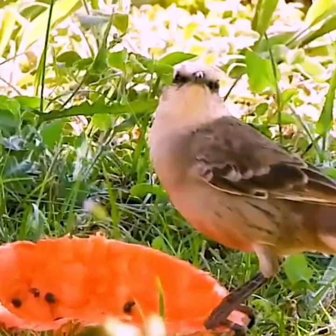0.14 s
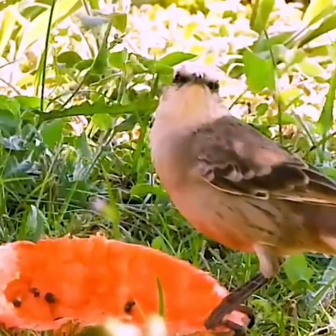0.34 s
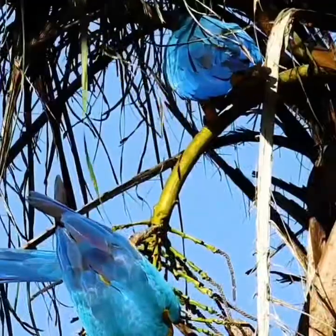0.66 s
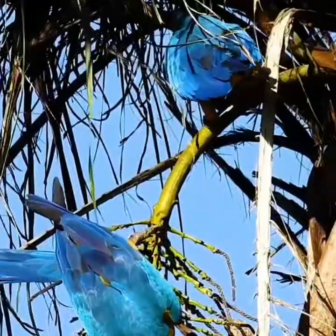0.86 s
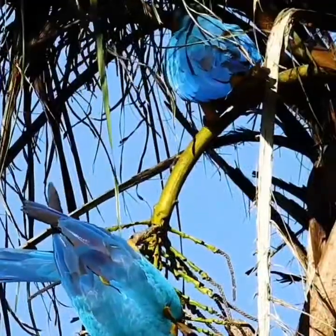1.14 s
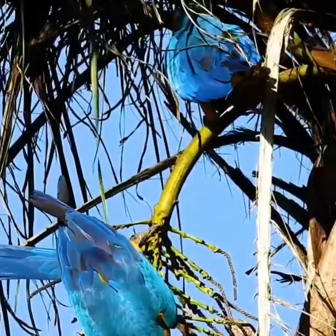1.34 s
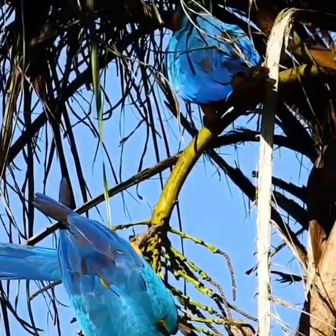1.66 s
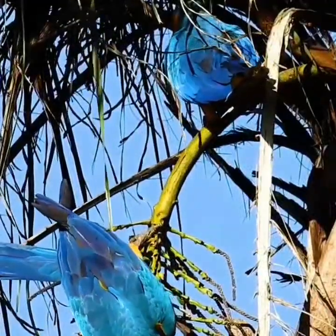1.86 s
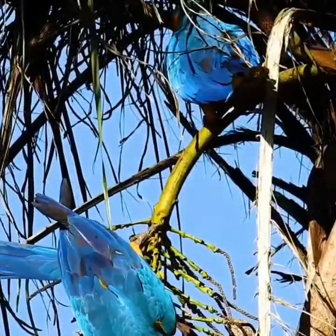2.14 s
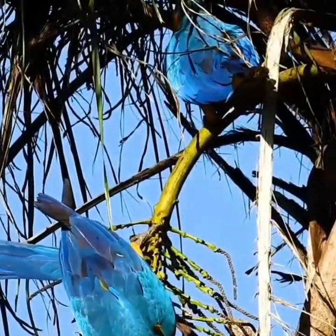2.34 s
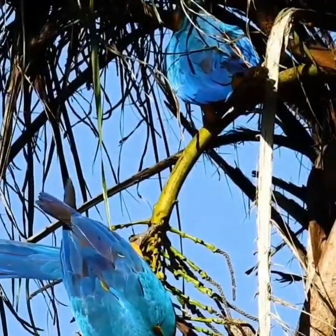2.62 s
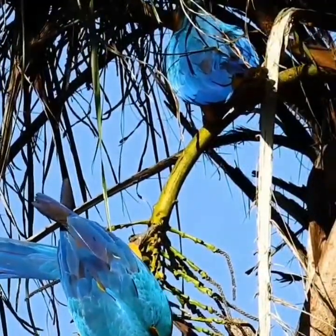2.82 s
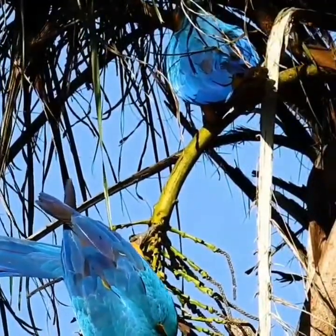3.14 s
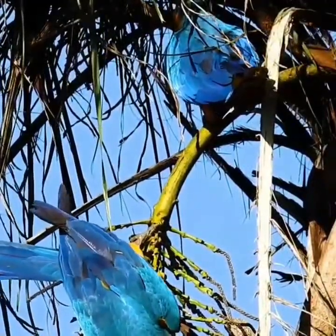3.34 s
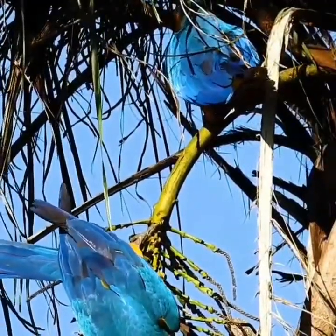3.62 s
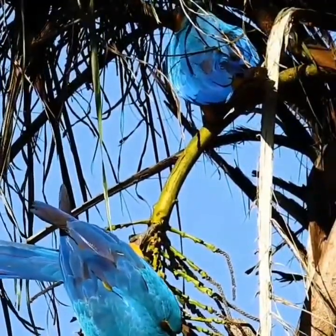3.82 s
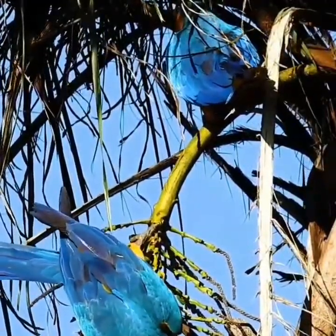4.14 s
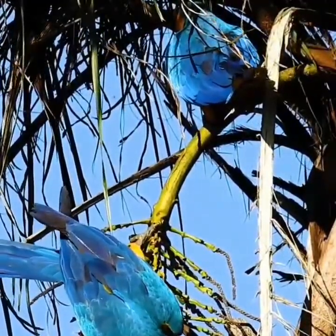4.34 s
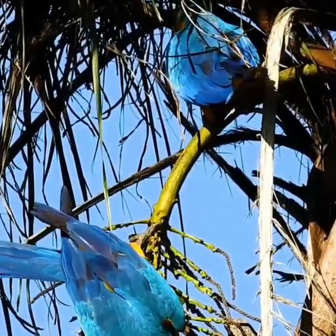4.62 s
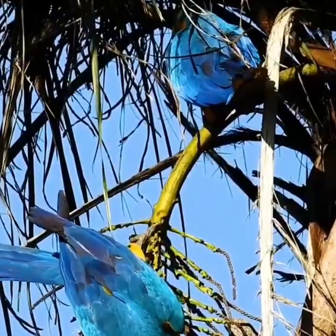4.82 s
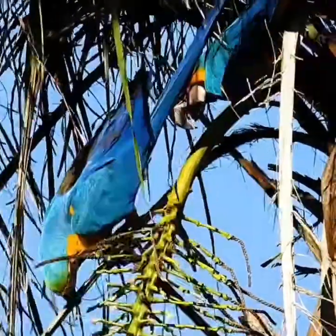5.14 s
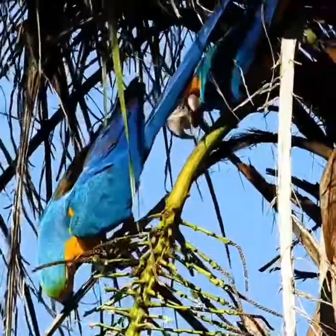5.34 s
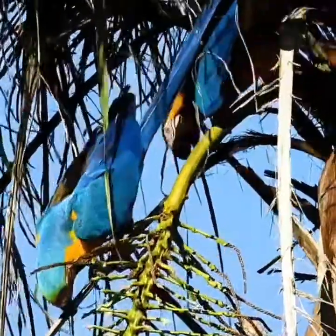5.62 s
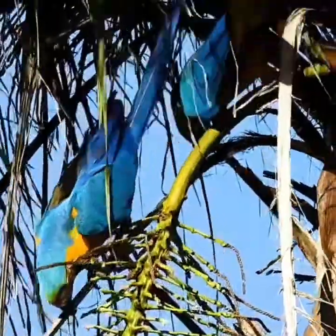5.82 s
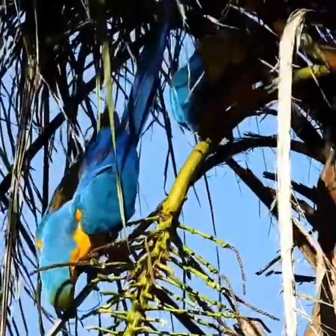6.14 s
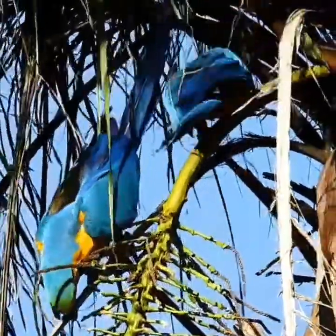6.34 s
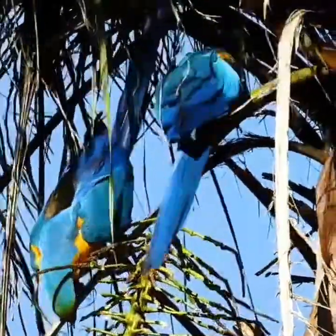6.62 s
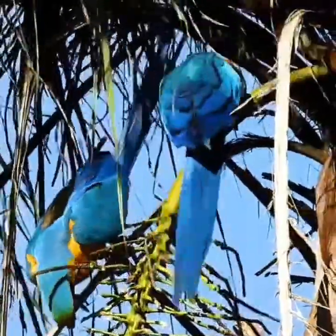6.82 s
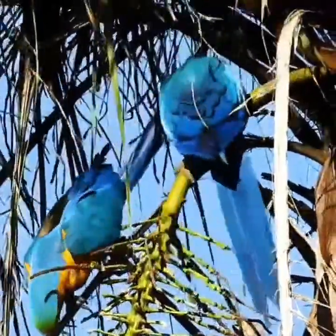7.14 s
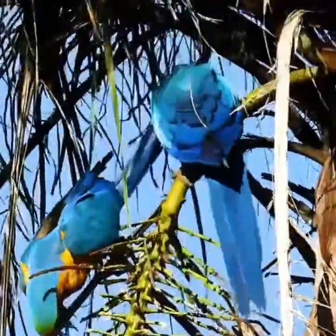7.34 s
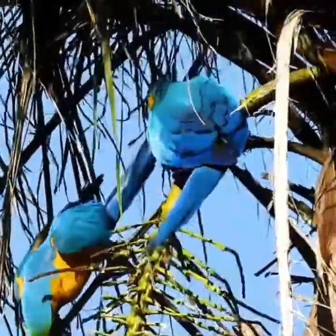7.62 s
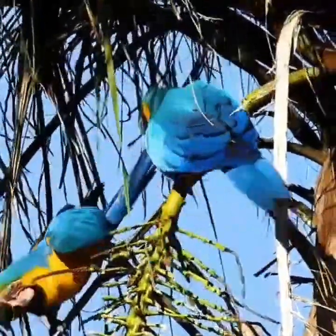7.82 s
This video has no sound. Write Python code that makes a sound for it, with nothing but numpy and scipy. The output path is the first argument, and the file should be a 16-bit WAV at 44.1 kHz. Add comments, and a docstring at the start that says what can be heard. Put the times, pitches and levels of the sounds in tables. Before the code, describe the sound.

Two close, buzzy chirps from a songbird and a brief rustle open the scene outdoors among palms. Almost at once a parrot flock starts squawking on both sides and keeps going, with loud raspy calls from nearer birds, a couple of croaks and a few whistled notes on top. A faint high hiss lies underneath. The microphone cuts out once very briefly and distorts a little on the peaks.

```python
"""A garden with palms. A songbird gives two buzzy chirps, then a parrot flock squawks, with single
squawks, croaks and pure notes above the din. Vibrating membranes make the calls, throat and beak shape
their partials, leaves and trunks scatter them. A rustle at the start, a high hiss throughout.
The sound drops out briefly near 5.2 s; loud peaks overload the recorder."""
import sys
import numpy as np
from scipy import signal
from scipy.fft import rfft, irfft, next_fast_len
from scipy.io import wavfile
from scipy.ndimage import uniform_filter1d, minimum_filter1d

SR = 44100
rng = np.random.default_rng(int(sys.argv[2]) if len(sys.argv) > 2 else 0)


def log_audio(samples):
    """Write samples as a 16-bit WAV file to the path given in sys.argv[1]."""
    # one column per channel
    frames = np.atleast_2d(samples).T
    # limit to full scale, then quantise
    limited = np.clip(frames, -1, 1)
    pcm = np.round(limited * 32767).astype(np.int16)
    wavfile.write(sys.argv[1], SR, pcm)


N = 351918

# near squawks, one table each: time_s, pitch_hz, level_db, tilt_db_per_oct (beak opening)
SQUAWK_CONTOURS = [
    [(1.01, 1221, -24, -6), (1.038, 1114, -21.5, -4.5), (1.092, 1160, -10, 2.5), (1.118, 1209, -20, 2),
     (1.19, 1154, -14.5, 3), (1.202, 1295, -14.5, 2.5), (1.23, 1280, -13.5, 4), (1.246, 1136, -13.5, -1),
     (1.28, 1120, -15.5, 8)],
    [(1.455, 1212, -16, -18), (1.469, 1252, -15, 3), (1.509, 1195, -16, 7.5), (1.537, 1313, -13.5, 1),
     (1.565, 1330, -20, -0.5), (1.593, 1526, -14, 4.5), (1.617, 1512, -15, -4), (1.629, 1387, -13, 0.5),
     (1.65, 1334, -17, 1)],
    [(1.83, 1139, -19, -2), (1.836, 1132, -13.5, -1), (1.846, 1256, -17, 9), (1.862, 1261, -7, -1.5),
     (1.892, 1213, -19, -1.5), (1.928, 1269, -8.5, 3), (1.968, 1245, -19, 4.5), (2.04, 1144, -10, 10.5)],
    [(2.215, 1209, -11, 0), (2.239, 1258, -12.5, -3), (2.295, 1245, -15.5, -3), (2.313, 1297, -11, 1),
     (2.351, 1315, -11.5, 2.5), (2.363, 1222, -14.5, -3), (2.389, 1253, -18.5, -1), (2.401, 1132, -16, 8),
     (2.42, 1110, -15, -2)],
    [(3.09, 1193, -13.5, 4), (3.108, 1370, -14, 7), (3.122, 1340, -20, 2), (3.138, 1288, -16, 2),
     (3.15, 1343, -19, -3), (3.158, 1228, -15, 2), (3.19, 1280, -25, 3)],
    [(3.7, 1115, -14.5, -1), (3.734, 1258, -9, 9.5), (3.754, 1254, -14.5, 0.5), (3.782, 1434, -13, -6),
     (3.806, 1253, -9, 8), (3.844, 1223, -16, 5), (3.862, 1267, -12, 5), (3.876, 1120, -10, 8),
     (3.9, 1140, -49, 2)],
    [(4.04, 1220, -12, 2), (4.08, 1223, -12.5, 4), (4.118, 1333, -14, -7), (4.128, 1192, -13.5, 0),
     (4.186, 1290, -13, 7.5), (4.206, 1206, -12.5, 2), (4.242, 1240, -16.5, -6), (4.248, 1210, -9.5, 3),
     (4.27, 1217, -16.5, 4)],
    [(4.355, 1200, -17, -4), (4.365, 1131, -17, 1), (4.395, 1170, -7.5, 5.5), (4.421, 1350, -20, -2.5),
     (4.443, 1280, -10, 7), (4.457, 1219, -13, -1), (4.475, 1237, -16, -2.5), (4.495, 1152, -17, -1),
     (4.51, 1090, -22, -8)],
    [(4.58, 1156, -22, 6), (4.588, 1092, -19, -5), (4.604, 1137, -14, -2), (4.646, 1181, -16.5, -8),
     (4.672, 1126, -11.5, -3), (4.714, 1315, -8, 6.5), (4.75, 1270, -13, -1.5), (4.768, 1334, -12, 2),
     (4.8, 1236, -13, 2)],
    [(4.99, 1236, -10, -3), (4.998, 1158, -14.5, -2.5), (5.012, 1125, -8.5, 3), (5.036, 1150, -21, -3),
     (5.046, 1052, -14, -4), (5.066, 1204, -15.5, 2), (5.09, 1265, -10.5, 2.5), (5.136, 1142, -12.5, 2),
     (5.15, 1090, -31, -2)],
    [(6.37, 1291, -16, -8), (6.39, 1333, -17.5, -12), (6.4, 1418, -9, 1.5), (6.456, 1470, -12.5, 0),
     (6.478, 1430, -18, 2), (6.49, 1490, -22, -2)],
    [(7.09, 1140, -18.5, 0), (7.098, 1260, -15, 1), (7.114, 1279, -11, 5.5), (7.15, 1399, -11, 3.5),
     (7.166, 1434, -9, 4), (7.192, 1450, -21, -3), (7.204, 1317, -12, 4), (7.228, 1250, -13.5, 3),
     (7.24, 1339, -18, 2)],
    [(2.64, 1276, -18, 0), (2.66, 1173, -18, -1.5), (2.69, 1159, -17.5, -3), (2.734, 1246, -12.5, 1.5),
     (2.752, 1140, -15, 11), (2.76, 1140, -16, 0)],
    [(3.42, 1134, -20, -2), (3.432, 1204, -19, 9), (3.506, 1184, -14, -4), (3.53, 1148, -13.5, -3),
     (3.536, 1080, -15.5, -9), (3.56, 1155, -40, 0)],
    [(5.28, 1140, -29, 6), (5.29, 1245, -21, 2.5), (5.332, 1256, -19.5, 1), (5.358, 1232, -30, 7),
     (5.386, 1276, -16, 0), (5.42, 1240, -24, 5)],
    [(5.64, 987, -34, 1.5), (5.668, 1077, -15.5, 2), (5.696, 1048, -19, -3), (5.71, 1079, -31, 0)],
    [(5.84, 1113, -20, 0), (5.86, 1052, -23, 0.5), (5.916, 1234, -23, 1), (5.922, 1313, -17, -4),
     (5.934, 1274, -32, 0), (5.97, 1070, -22, 0)],
    [(6.14, 1066, -20, -12), (6.164, 1108, -27, -5), (6.176, 1248, -23, 9), (6.204, 1268, -29, 4),
     (6.212, 1177, -21.5, 2), (6.26, 1153, -12, 1.5)],
    [(6.27, 1276, -19, -7), (6.294, 1252, -15.5, -4), (6.306, 1144, -16, 0), (6.33, 1142, -16, 0),
     (6.34, 1168, -10, -2), (6.36, 1204, -14.5, 0)],
    [(7.37, 1378, -17, 0), (7.418, 1553, -15, 3), (7.47, 1574, -19, -3), (7.482, 1521, -13.5, 0),
     (7.492, 1567, -18, 1), (7.512, 1418, -14, 1), (7.53, 1425, -22, 2)],
    [(0.64, 1117, -25, 0), (0.68, 1107, -19.5, -1), (0.776, 1130, -22.5, 0), (0.79, 1218, -22, 1),
     (0.822, 1126, -20, 0), (0.882, 1198, -16, 3.5), (0.93, 1090, -27, 0)],
    [(2.92, 1113, -20, 2), (2.934, 1110, -18, 0), (2.958, 1190, -16, 5), (2.992, 1153, -19.5, 7),
     (2.998, 1199, -16.5, 1), (3.058, 1192, -17, 1), (3.08, 1216, -18, -3)],
    [(6.5, 1140, -26, 1), (6.57, 1203, -23.5, -2), (6.608, 1082, -14.5, -3), (6.62, 1145, -21.5, -8),
     (6.692, 1181, -10.5, 4), (6.706, 1083, -28, -4), (6.75, 1155, -21, 0)],
    [(6.76, 1082, -16, 2), (6.782, 1057, -14, 2), (6.802, 1166, -22, -6), (6.836, 1100, -23, 0),
     (6.848, 1140, -12, -4), (6.88, 1166, -24, 4), (6.9, 1020, -24, 0)],
    [(6.9, 996, -23, 3), (6.91, 933, -20.5, 6), (6.994, 1072, -23, -2), (7.016, 1192, -22, -13),
     (7.042, 1182, -25, 4), (7.054, 1100, -21, -4), (7.09, 1159, -22, -7)],
]
# hoarseness, one per squawk: 0 clear, 1 raw
SQUAWK_ROUGHNESS = [.2, .15, .15, .18, .3, .07, .15, .07, .06, .12, .08, .07, .25, .15, .2, .15, .35, .3,
                    .2, .06, .3, .3, .22, .22, .22]
# timbre, one row per squawk: partial1_db ... partial5_db
SQUAWK_PARTIALS = [(-12, -5.5, -0.5, -2.5, -3), (-7.5, 0.5, -2.5, -2.5, -8.5), (-12.5, 1, -2, -3, -4),
                   (-14, 0.5, -1.5, 1, -1), (-12, -0.5, -3.5, -3, -2), (-11, -1.5, -0.5, 0.5, -1.5),
                   (-22, 0, -1.5, -1, -0.5), (-14, -5.5, -5.5, -0.5, -1.5), (-12, 2, 0.5, 0.5, 2),
                   (-12.5, -1.5, 1.5, -2.5, -8), (-11.5, 0.5, 2, -0.5, -10), (-6.5, -0.5, -3.5, -2, 0),
                   (-17.5, -4, -2.5, -5, -4), (-28.5, 0, 0, -10, -15), (-1.5, -4, -14, -4, -1.5),
                   (-12, 0, -16, -10.5, -20), (0.5, -3, -22, -1, -11), (-11.5, -1, -2, -2.5, -3),
                   (-18.5, -0.5, -6, -8, -9), (-13.5, -12, -1, -7.5, -15), (-19, -11, -2, 0, -3),
                   (-23, -16, -0.5, -1, -8), (-12.5, 2.5, -13, -5, -20), (-14.5, 2, -5, -7, -17),
                   (-9.5, 4, -18, -2.5, -19)]
# hoarse croaks: start_s, length_s, top_hz, level_db
CROAK_NOTES = [(5.528, .08, 926, -19.5), (7.229, .18, 834, -11)]
# croak throat response: freq_hz, gain_db
CROAK_THROAT_EQ = [(500, -47), (820, -12), (1300, 9.5), (1700, 0), (2500, 3.5), (3100, 1), (4000, -11),
                   (7900, -1)]
# mouth resonances, beak open: centre_hz, width_hz, gain_db
CROAK_FORMANTS = [(1610, 154, 8), (3050, 260, 10.5)]
# two low coos, a thin whistle, then two ringing tones of the last squawk, ending in a falling note:
# start_s, length_s, first_hz, last_hz, level_db
PURE_NOTES = [(.51, 0.37, 617, 488, -42.5), (1.65, 0.29, 652, 560, -44.5), (2.355, .145, 2990, 2816, -18),
              (7.43, 0.067, 1570, 1600, -22.5), (7.493, 0.051, 3000, 2224, -15)]
# flock envelope: time_s, level_db
FLOCK_LEVEL = [(.485, -17.5), (.57, -17.5), (.68, -12.5), (.87, -13), (.97, -17.5), (1.09, -11),
               (1.33, -15.5), (1.43, -15.5), (1.47, -10.5), (1.68, -15.5), (1.95, -9.5), (2.2, -18),
               (2.22, -8.5), (2.6, -13.5), (3.06, -11), (3.23, -16.5), (3.34, -15.5), (3.37, -10.5),
               (3.52, -11.5), (3.56, -14), (3.82, -10.5), (3.92, -13), (4.17, -7), (4.32, -13), (4.53, -14),
               (4.69, -7), (4.95, -16), (5.01, -6.5), (5.14, -8), (5.24, -20), (5.49, -18.5), (5.57, -13),
               (5.76, -19), (5.87, -13.5), (6.01, -16.5), (6.24, -12.5), (6.36, -10.5), (6.45, -9),
               (6.49, -18.5), (6.54, -19.5), (6.68, -10.5), (6.72, -17.5), (6.79, -15.5), (7.27, -12.5),
               (7.52, -13.5), (7.58, -19), (7.98, -16)]
# flock colour: freq_hz, gain_db
FLOCK_EQ = [(120, -79), (200, -41.5), (603, -15.5), (736, -16.5), (1170, -15), (1560, -4.5), (2220, -2.5),
            (2400, -4), (3160, -1.5), (3680, -2), (3970, -5.5), (4490, -0.5), (6590, 1.5), (7010, -0.5),
            (7800, -13), (10100, -46), (17200, -120)]
# songbird chirps, one table each: time_s, pitch_hz, level_db
CHIRP_CONTOURS = [
    [(0.0, 792, -4), (0.022, 809, -11), (0.042, 760, -11.5), (0.058, 716, -12), (0.08, 704, -12),
     (0.088, 651, -15.5), (0.104, 643, -19), (0.114, 655, -31), (0.125, 642, -32)],
    [(0.19, 630, -23), (0.198, 655, -18), (0.206, 645, -11), (0.226, 705, -10.5), (0.262, 722, -12),
     (0.284, 632, -13.5), (0.3, 624, -14), (0.314, 668, -32), (0.325, 683, -35)],
]
# songbird throat response: freq_hz, gain_db
CHIRP_THROAT_EQ = [(710, -76), (1200, -28), (1520, -13), (2400, -12), (2580, -5.5), (2880, -6.5),
                   (3190, -5), (4850, -8), (6040, -26.5), (6330, -17), (7900, -26.5), (10300, -60),
                   (17400, -120)]
# garden rustle colour: freq_hz, gain_db
RUSTLE_EQ = [(180, -101), (300, -58), (1910, -9), (1990, -10), (2650, -6), (3220, -5), (3350, -2.5),
             (4060, -4), (4790, -4), (7950, -17), (10300, -96), (17500, -120)]
# hiss envelope: time_s, level_db
HISS_LEVEL = [(0, -26), (.15, -40.5), (.26, -29), (.38, -42.5), (.53, -33), (1.8, -34.5), (2.7, -38),
              (4.3, -37.5), (5.1, -34.5), (5.7, -33.5), (6.5, -36), (7.98, -33.5)]
# hiss colour: freq_hz, gain_db
HISS_EQ = [(4790, -19.5), (8150, 3.5), (8240, -19), (8690, 7.5), (9240, 10), (9800, 2), (10100, -0.5),
           (10600, -36), (10800, -16.5), (13700, -7), (14500, -26), (15400, -12.5)]
# microphone port response, birds only: freq_hz, gain_db
PORT_EQ = [(100, -52), (250, -11), (400, -5.5), (700, -3), (7600, -0.32), (7880, -4.5), (8000, -50)]
# left-right difference: freq_hz, gain_db
SIDE_EQ = [(300, -22), (700, -54), (1200, -69), (2000, -27), (3000, -15), (4500, -5.5), (6000, -1),
           (7800, 1.5), (8200, -23), (9400, -24), (10000, -7.5), (15000, -1.5)]
# brief dropout: time_s, gain_db
DROPOUT_GAIN = [(5.14, 0), (5.17, -55), (5.215, -48), (5.24, 1)]

NOTE_ENDS_DB = -7


def squawks(sixth_partial_db=-13, wander_db=2):
    """Near parrots: six drifting partials that brighten as the beak opens."""
    out = np.zeros(N)
    for rows, rough, own_db in zip(SQUAWK_CONTOURS, SQUAWK_ROUGHNESS, SQUAWK_PARTIALS):
        hz, level_db, tilt_db_per_oct = columns(rows, span(rows))
        timbre_db = [*own_db, own_db[-1] + sixth_partial_db]
        shape_db = np.array([db + tilt_db_per_oct * np.log2(k / 3) for k, db in enumerate(timbre_db, 1)])
        shape_db -= 10 * np.log10((gain_of(shape_db) ** 2).sum(0))  # unit power
        drift_db = wander_db * smooth_noise(6, len(hz), window=900)
        add(out, rows[0][0], syrinx(hz, level_db + shape_db + drift_db, rough, jitter=.01194))
    return out


def croaks(arch_depth=.12, beak_shut=.73):
    """Arched rasps. Alternate pulses are weaker, adding lines between the partials."""
    out = np.zeros(N)
    for start_s, length_s, top_hz, level_db in CROAK_NOTES:
        progress = np.linspace(0, 1, round(length_s * SR))
        arch = np.sin(np.pi * progress ** .85)
        sub_hz = top_hz * (1 - arch_depth + arch_depth * arch) / 2
        # the beak opens fast, raising the formants, and closes slowly
        beak = beak_shut + (1 - beak_shut) * np.sin(np.pi * progress ** .55)
        partials_db = []
        for k in range(1, 18):
            mouth_db = sum(db * np.exp(-((k * sub_hz - centre_hz * beak) / width_hz) ** 2)
                           for centre_hz, width_hz, db in CROAK_FORMANTS)
            partials_db.append(eq_db(CROAK_THROAT_EQ, k * sub_hz) - 5 * (k % 2) + mouth_db)
        rasp = unit_rms(syrinx(sub_hz, partials_db, rough=.3, jitter=.04))
        add(out, start_s, gain_of(level_db + NOTE_ENDS_DB * (1 - arch)) * rasp)
    return out


def pure_notes():
    """Coos, a whistle and the last squawk's ringing tones: each one partial on a linear glide."""
    out = np.zeros(N)
    for start_s, length_s, first_hz, last_hz, level_db in PURE_NOTES:
        progress = np.linspace(0, 1, round(length_s * SR))
        hz = first_hz + (last_hz - first_hz) * progress
        envelope_db = level_db + NOTE_ENDS_DB * (2 * progress - 1) ** 4
        add(out, start_s, syrinx(hz, [envelope_db], rough=.12, jitter=.0016))
    return out


def flock(count=360):
    """Overlapping arched squawks, alternately left and right, over their far blur."""
    sides = np.zeros((2, N))
    for k, (offset, length, pitch, arch, loudness) in enumerate(rng.random((count, 5))):
        progress = np.linspace(0, 1, round((.05 + .15 * length) * SR))
        spread = 2 * pitch - 1
        base_hz = 1130 + 250 * spread ** 3 + 110 * spread
        hz = base_hz * (1 + .2 * arch * np.sin(np.pi * progress) ** 2)
        partials_db = 7 * loudness + 4 * rng.standard_normal(7)
        start_s = (k + offset) / count * N / SR
        add(sides[k % 2], start_s, syrinx(hz, partials_db, rough=.3, jitter=.02))
    sides = np.array([tree_scatter(x, t60_s=.24, wet_db=3) for x in sides])
    blur = gain_of(-7) * patchy_noise(FLOCK_EQ, patch_db=4)
    din = unit_rms(equalise(sides, FLOCK_EQ)) + blur
    return flock_swell(unit_rms(din))


def flock_swell(din):
    """Flock envelope: brighter when louder, 1 dB/oct duller after the dropout."""
    hz, t, spectrum = signal.stft(din, SR, nperseg=256)
    level_db = columns(FLOCK_LEVEL, t)[0]
    after_dropout = t > DROPOUT_GAIN[1][0]
    tilt_db_per_oct = -1 + .353 * (level_db + 14) - after_dropout
    octaves = np.log2((hz[:, None] + 100) / 4000)
    spectrum *= gain_of(level_db + octaves * tilt_db_per_oct) * (t > FLOCK_LEVEL[0][0])
    return signal.istft(spectrum, SR, nperseg=256)[1][:, :N] / np.sqrt(2)


def songbird(clear_db=-13, rough_per_db=.07):
    """Buzzy chirps: many overtones through a fixed throat, brightening, rougher when quiet."""
    out = np.zeros(N)
    for rows in CHIRP_CONTOURS:
        hz, level_db = columns(rows, span(rows))
        tilt_db_per_oct = np.linspace(4, 10.5, len(hz))
        rough = np.clip(.1 + rough_per_db * (clear_db - level_db), .1, .8)
        partials_db = [eq_db(CHIRP_THROAT_EQ, k * hz) + tilt_db_per_oct * np.log2(k * hz / 4000)
                       for k in range(1, 12)]
        buzz = unit_rms(syrinx(hz, partials_db, rough, jitter=.005))
        add(out, rows[0][0], gain_of(level_db) * buzz)
    return out


def syrinx(hz, partials_db, rough, jitter):
    """Partials on a wobbling pitch; rough membranes shake the pitch and each partial's level."""
    shake = smooth_noise(len(partials_db) + 1, len(hz), window=50)
    wobble = smooth_noise(1, len(hz), window=400)[0]
    cycles = np.cumsum(hz * (1 + jitter * wobble + .03 * rough * shake[0])) / SR
    out = np.zeros(len(hz))
    for k, db in enumerate(partials_db, 1):
        flutter = np.sqrt(1 - rough) + np.sqrt(rough) * shake[k]
        out += gain_of(db) * flutter * np.cos(2 * np.pi * (k * cycles + k * k / 7))
    fades = signal.windows.tukey(len(hz), min(1, .0089 * SR / len(hz)))
    return np.sqrt(2) * out * fades


def tree_scatter(x, t60_s, wet_db):
    """Leaves and trunks add a decaying noise tail."""
    t = np.arange(SR // 2) / SR
    tail = rng.standard_normal(len(t)) * gain_of(-60 * t / t60_s) * (t > .006)
    return x + gain_of(wet_db) * signal.fftconvolve(x, tail / np.linalg.norm(tail))[:N]


def rustle(end_s=.49):
    """Opening garden rustle: patchy mid and treble noise."""
    return gain_of(-26.5) * (np.arange(N) / SR < end_s) * patchy_noise(RUSTLE_EQ, patch_db=4.5)


def hiss(duck_db):
    """High, patchy hiss, lowered by duck_db."""
    level_db = columns(HISS_LEVEL, np.arange(N) / SR)[0]
    return gain_of(level_db - duck_db) * patchy_noise(HISS_EQ, patch_db=4)


def patchy_noise(eq, patch_db):
    """Two independent noises, level drifting in patches over time and frequency."""
    real, imag, patches = rng.standard_normal((N // 128 + 5, 257, 2, 3)).T
    patches = unit_rms(uniform_filter1d(uniform_filter1d(patches[0], 3, 0), 28, 1))
    colour_db = eq_db(eq, np.fft.rfftfreq(512, 1 / SR))[:, None]
    spectrum = (real + 1j * imag) * gain_of(colour_db + patch_db * patches)
    return unit_rms(signal.istft(spectrum, nperseg=512, noverlap=384)[1][:, :N])


def smooth_noise(count, length, window):
    """Rows of smoothed noise, rms about 1."""
    white = rng.standard_normal((count, length))
    return uniform_filter1d(uniform_filter1d(white, window), window) * np.sqrt(3 * window / 2)


def equalise(x, eq):
    size = next_fast_len(x.shape[-1])
    gain = gain_of(eq_db(eq, np.fft.rfftfreq(size, 1 / SR)))
    return irfft(rfft(x, size) * gain, size)[..., :x.shape[-1]]


def eq_db(eq, hz):
    freq_hz, gain_db = np.transpose(eq)
    return np.interp(np.log(hz + 1), np.log(freq_hz + 1), gain_db)


def gain_of(db):
    return 10 ** (np.asarray(db) / 20)


def unit_rms(x):
    return x / np.sqrt(np.mean(x ** 2) + 1e-20)


def columns(rows, t):
    time_s, *values = np.transpose(rows)
    return [np.interp(t, time_s, column) for column in values]


def span(rows):
    return np.arange(rows[0][0], rows[-1][0], 1 / SR)


def add(mix, start_s, sound):
    part = mix[round(start_s * SR):][:len(sound)]
    part += sound[:len(part)]


def scene():
    """Sound from left and right reaches two close ports at slightly different times."""
    parrots = tree_scatter(squawks() + croaks() + pure_notes(), t60_s=.15, wet_db=-6)
    chirps = tree_scatter(songbird(), t60_s=.11, wet_db=-8)
    near = equalise([[.85], [.15]] * parrots + [[.75], [.25]] * chirps, PORT_EQ)
    near_db = 10 * np.log10(abs(uniform_filter1d(near.sum(0) ** 2, 1500)) + 1e-12)
    duck_db = .8 * np.maximum(near_db + 20, 0)  # din and hiss sink under a loud near bird
    din = equalise(flock(), PORT_EQ) / gain_of(duck_db)
    background = (rustle() + hiss(.32 * duck_db)) / np.sqrt(2)
    left, right = near + din + background
    mid = left + right
    quadrature = signal.hilbert(left - right, next_fast_len(N)).imag[:N]
    side = equalise(.14 * mid - quadrature, SIDE_EQ)  # left port slightly less sensitive
    return np.array([mid - side, mid + side])


def record(dry):
    """Dropout, fast limiter that lets a few peaks clip, band limit."""
    heard = dry * gain_of(columns(DROPOUT_GAIN, np.arange(N) / SR)[0])
    peak = -minimum_filter1d(-abs(heard).max(0), 90)
    reduction = uniform_filter1d(np.maximum(peak, 1), 130) ** .45
    clipped = np.clip(heard / reduction, -1, 1)
    lowpass = signal.firwin(511, cutoff=15595, window=("kaiser", 9), fs=SR)
    return signal.oaconvolve(clipped, lowpass[None], "same")


dry = scene()
out = record(dry)
log_audio(out)
```